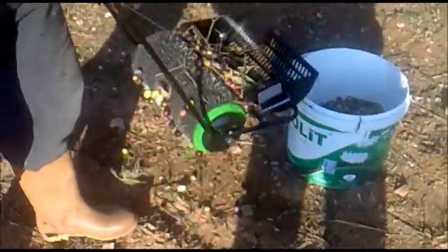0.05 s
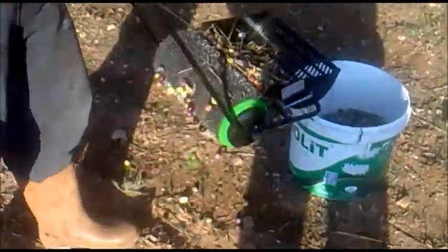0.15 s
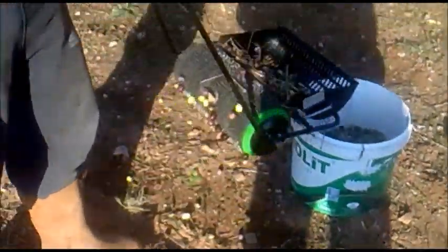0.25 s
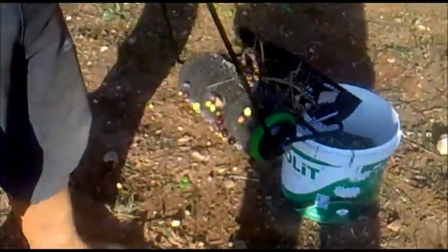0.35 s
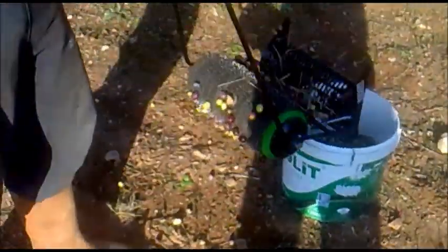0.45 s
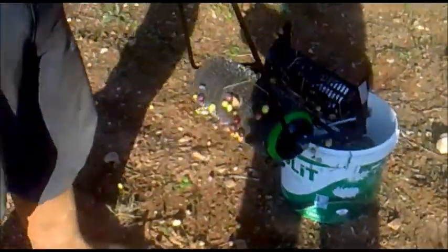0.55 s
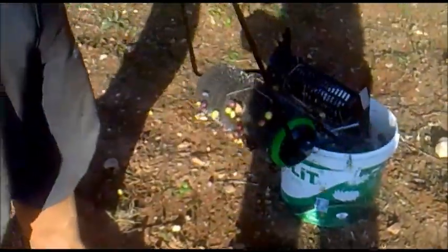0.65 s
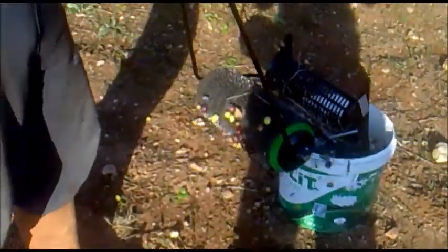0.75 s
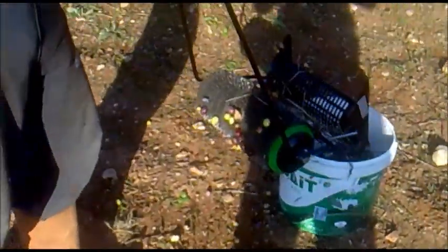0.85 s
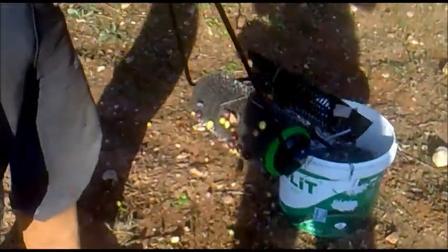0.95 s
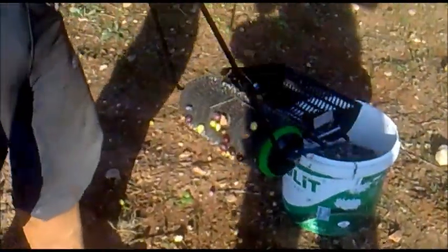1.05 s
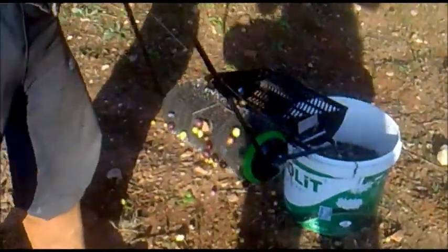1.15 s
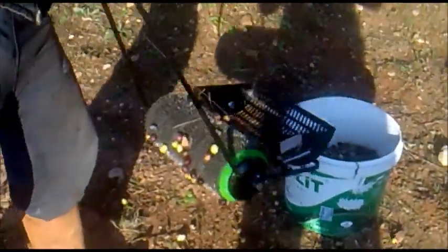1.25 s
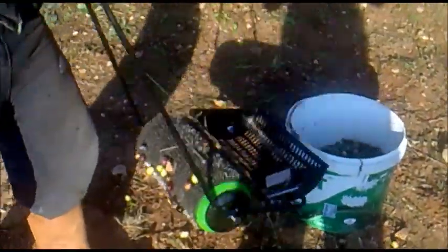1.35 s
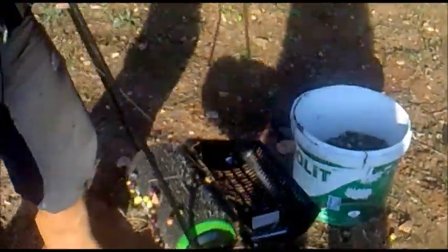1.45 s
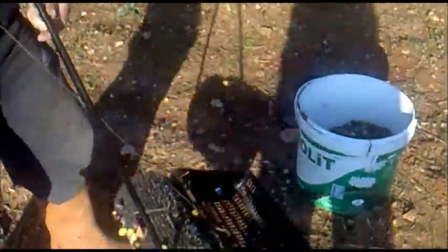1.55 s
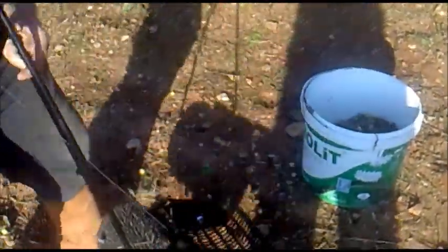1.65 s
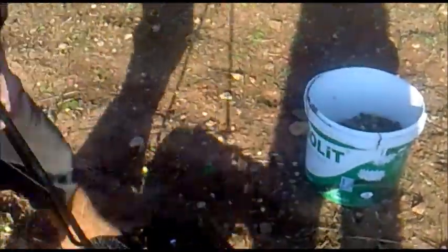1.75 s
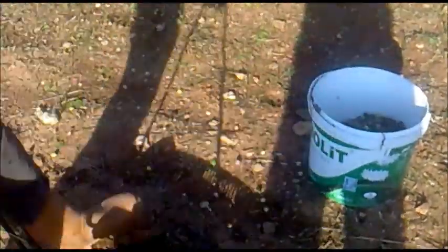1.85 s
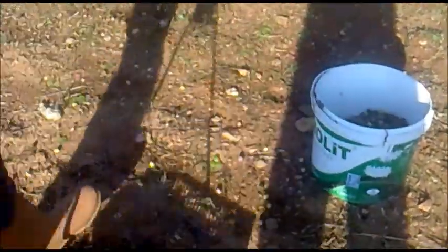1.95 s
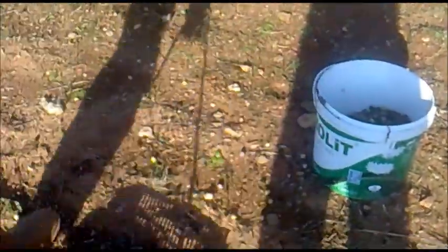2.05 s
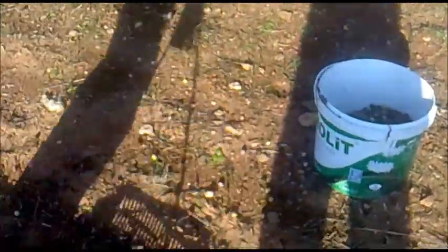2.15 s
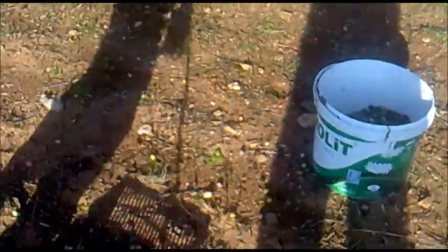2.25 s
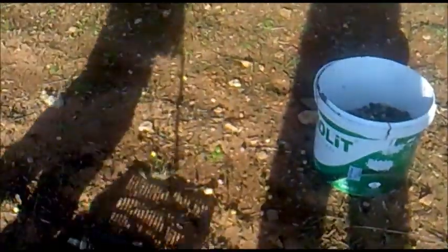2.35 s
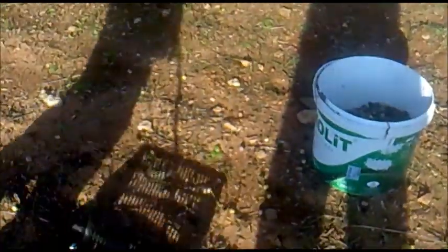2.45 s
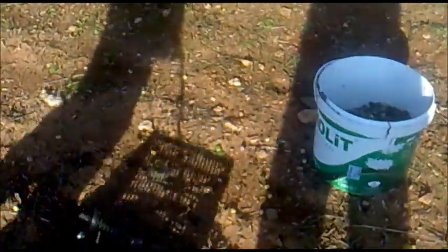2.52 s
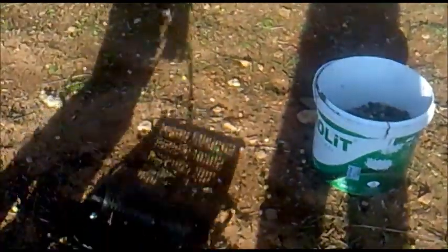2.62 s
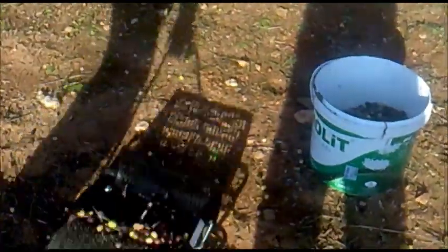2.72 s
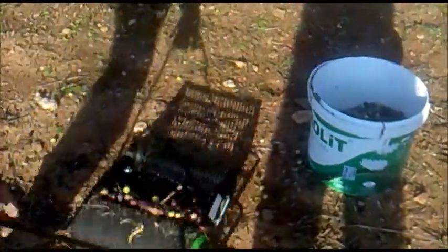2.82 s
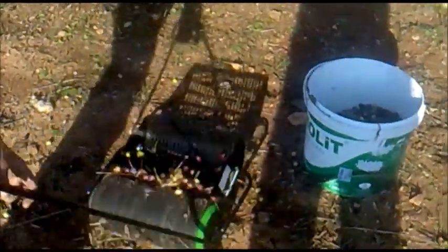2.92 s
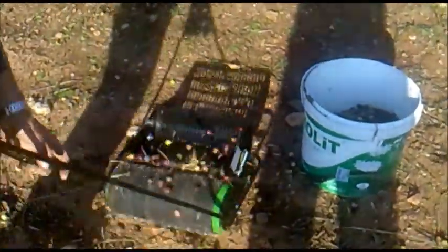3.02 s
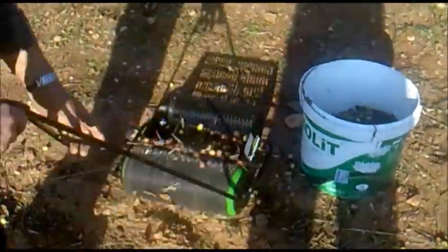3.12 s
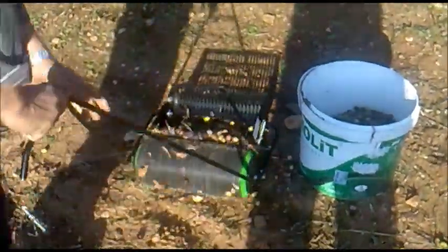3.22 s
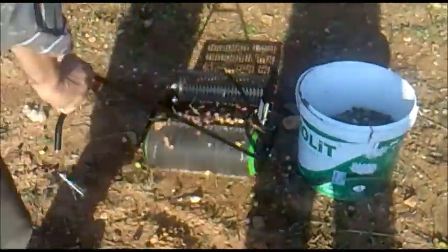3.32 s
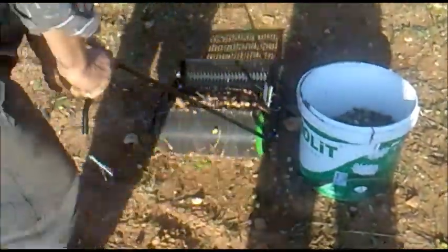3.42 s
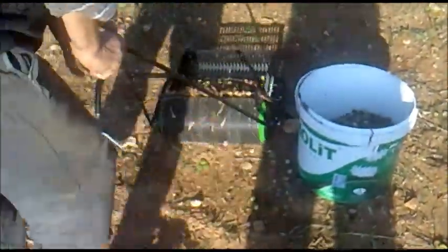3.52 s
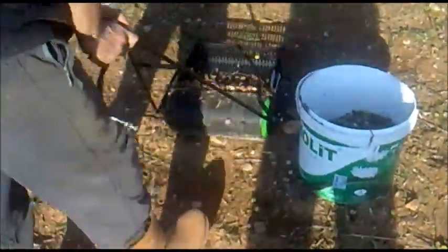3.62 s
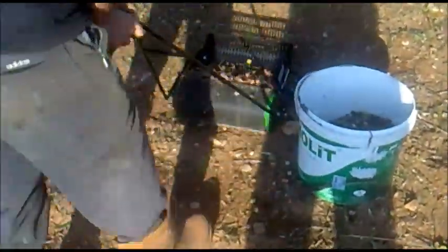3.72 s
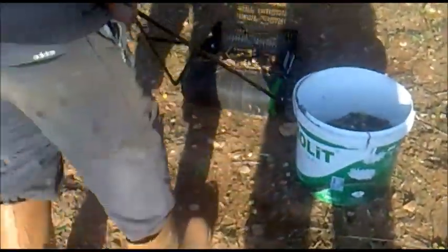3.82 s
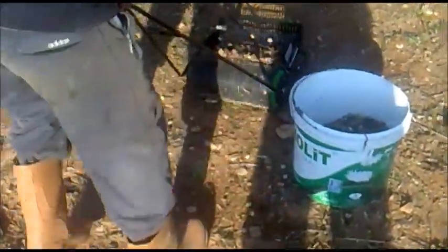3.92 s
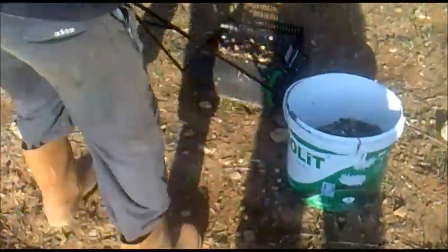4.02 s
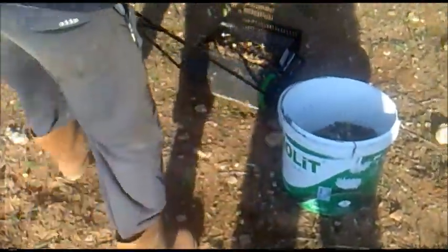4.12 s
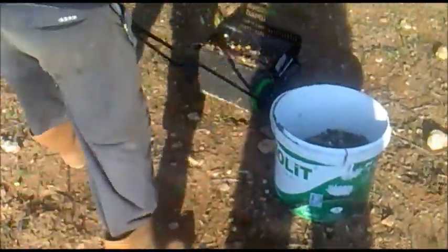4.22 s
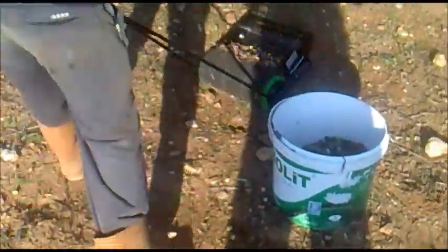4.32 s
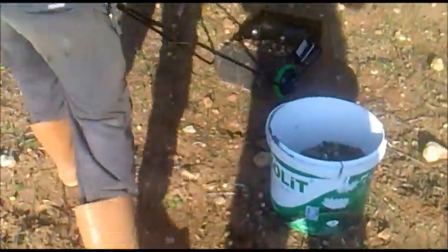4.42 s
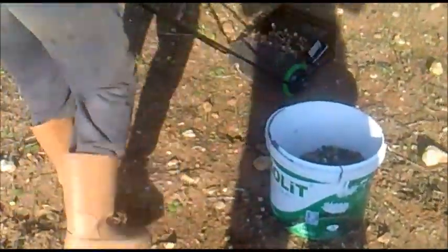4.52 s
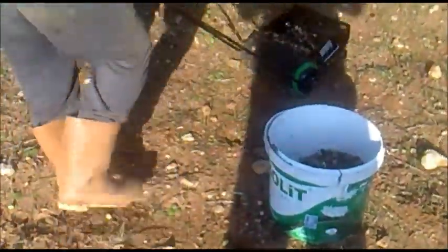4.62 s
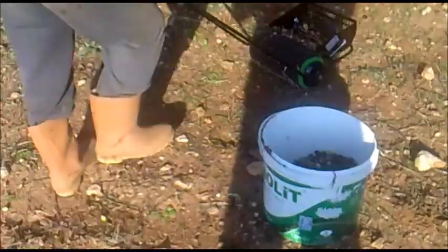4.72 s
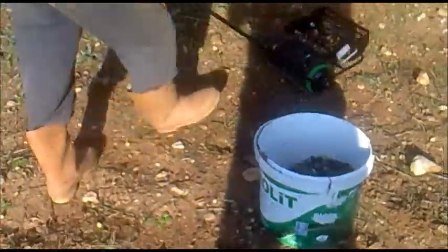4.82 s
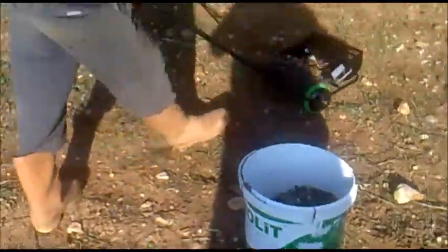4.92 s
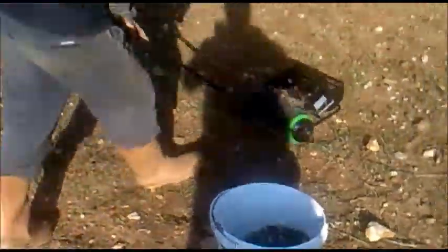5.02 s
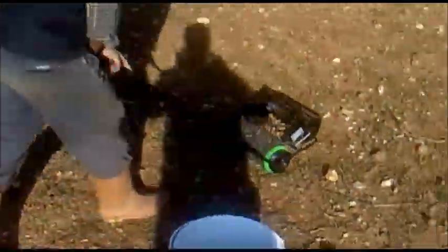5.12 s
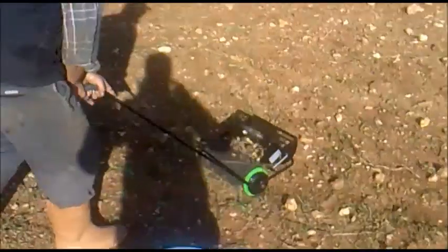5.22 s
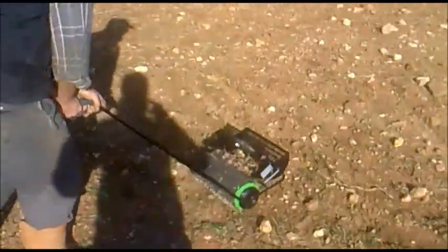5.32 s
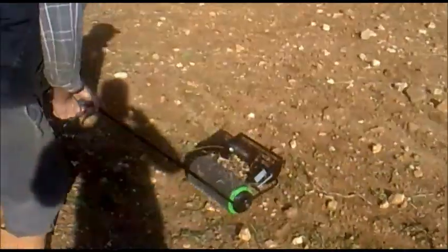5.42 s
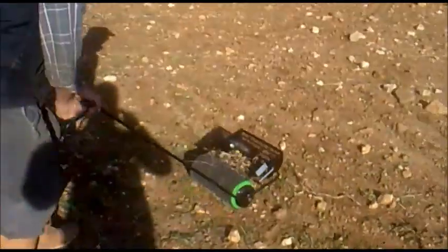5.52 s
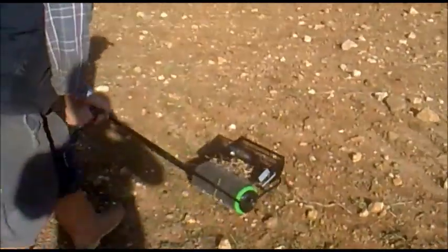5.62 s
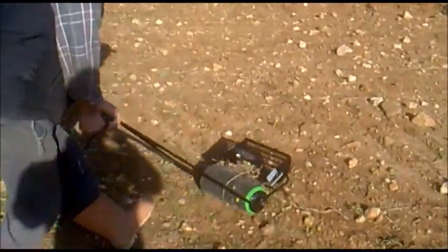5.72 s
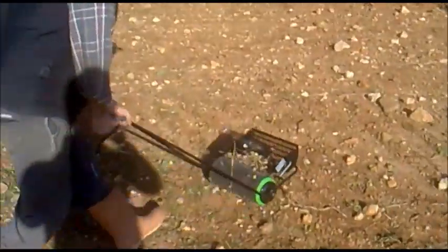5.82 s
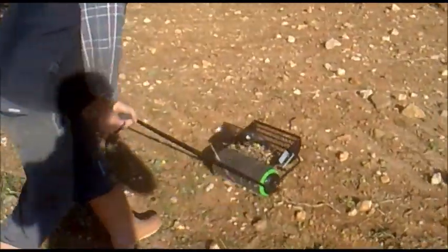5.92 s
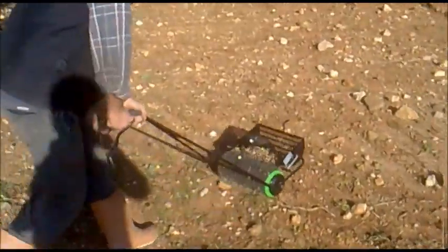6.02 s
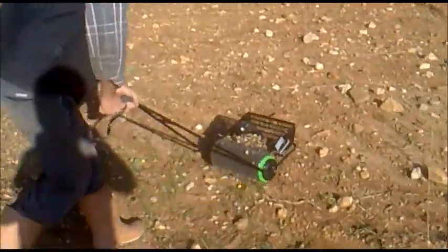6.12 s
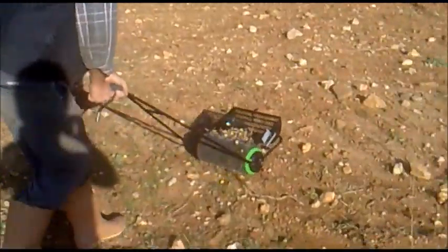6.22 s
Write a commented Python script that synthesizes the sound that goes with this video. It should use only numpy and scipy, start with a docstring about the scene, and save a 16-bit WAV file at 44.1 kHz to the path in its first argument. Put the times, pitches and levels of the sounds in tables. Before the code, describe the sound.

Outdoors on dry stony soil, close mono microphone, no reverberation, faint steady air and low wind puffs. The first half second is quiet, with a small rustle and a tick. At 0.67 s a loud blow: metal basket on plastic bucket rim, a short hollow boom with clattering olives, tumbling on in quick knocks until about 1.1 s. At 1.21 s a second loud blow, brighter and drier, with a sandy snap and fading rattle; wind swells softly. At 1.52 s the steel frame clangs on the ground, ringing under half a second, with lesser jangles at 1.6 and 1.72 s. It nearly falls silent around 2 s, with tiny ticks and pings from 2.3 s. From 2.7 to 4.2 s the roller rattles and scrapes in lurches, with a brief chatter near 3.15 s. After a short lull, a second push from 4.5 s rattles farther off, gritty and uneven, with little taps, stone cracks and wind thuds near 5.4-5.7 s, still rolling at the 6.3 s end.

```python
"""Outdoors, on dry stony soil: a picking roller's basket tips olives into a plastic bucket and knocks the rim twice;
its steel frame clangs on the ground, then the roller is pushed twice, lurching and cracking stones.
Rattle, grit and rumble are coloured random contacts under shared movement gains; olives, bucket, frame
and pings are damped modes. Wind puffs at the microphone are low noise and single pressure swings."""
import sys
import numpy as np
from scipy import signal
from scipy.fft import rfft, irfft
from scipy.io import wavfile
from scipy.ndimage import uniform_filter1d

SR = 44100
rng = np.random.default_rng(int(sys.argv[2]) if len(sys.argv) > 2 else 0)


def store_wav(level_fs):
    """Save 16-bit WAV to argv[1]."""
    pcm = np.round(np.clip(np.atleast_2d(level_fs), -1, 1) * 32767)
    wavfile.write(sys.argv[1], SR, pcm.T.astype(np.int16))


N = 276066

# Spectra, normalised in use: (frequency [Hz], relative density [dB per Hz])
# basket rattle with loose load
BASKET_NEAR_SPECTRUM = [(420, -8.5), (1080, -7), (1350, -1.5), (2470, -4), (3200, -14.5), (4700, -32)]
# basket rattle further off
BASKET_FAR_SPECTRUM = [(610, -32), (744, 1), (1300, 4.5), (1740, -7), (2320, 7), (3100, -8), (3800, -8.5),
                       (4400, -14)]
# sand and twigs shaken about
SAND_SPECTRUM = [(3000, 7), (4600, -1.5), (5350, 8.5), (6400, 9), (10100, -0.5), (11000, -9.5),
                 (16000, -6.5)]
# grit under the drum
SCRAPE_SPECTRUM = [(3000, 4), (4600, -6.5), (5600, 7), (8000, -4), (9600, -9), (10300, -2), (11200, -17),
                   (16000, -10)]
# drum on soil
RUMBLE_SPECTRUM = [(90, -1.5), (257, -1), (429, -5.5), (500, -14), (900, -12)]
# wind at the microphone
WIND_SPECTRUM = [(15, -4.5), (43, -1.5), (62, -1.5), (86, -6), (155, -30), (400, -65.5)]
# steady background noise
AIR_SPECTRUM = [(100, 1.5), (163, -5), (389, -3.5), (600, -10), (1130, -9), (1800, -17), (2320, -12.5),
                (3540, -16.5), (16000, -16.5)]

# Roller moving away: (time [s], power share of the far rattle [0-1])
FAR_SHARE = [(4.3, 0), (4.6, 1)]
# Steady movement of the roller: (time [s], rattle level [dB])
ROLL_LEVELS = [(0.0, -70), (2.2, -72), (2.68, -62.5), (2.85, -53), (3.38, -54), (3.62, -59), (4.18, -60.5),
               (4.3, -70), (4.48, -68), (4.68, -59.5), (4.86, -63), (5.05, -53.5), (5.31, -59),
               (5.62, -55.5), (5.9, -61.5), (6.26, -59)]
# Short lurches: (middle [s], half-length [s], rattle [dB], grit [dB], rumble [dB])
LURCHES = [(0.17, 0.021, -59, -83, -49.5), (0.817, 0.04, -36, -40, -58), (0.873, 0.034, -36.5, -67, -41),
           (0.956, 0.033, -36.5, -56.5, -43), (1.054, 0.14, -47, -57.5, -52.5),
           (1.667, 0.062, -58, -58.5, -71), (2.346, 0.028, -49.5, -58, -59),
           (2.437, 0.084, -61.5, -66.5, -57.5), (3.148, 0.059, -47.5, -49, -46.5),
           (3.514, 0.035, -49.5, -65, -58), (3.745, 0.06, -57.5, -65, -50.5),
           (3.882, 0.075, -58.5, -63, -60), (3.977, 0.04, -54, -67, -57), (4.208, 0.051, -57, -82, -59),
           (4.598, 0.063, -48.5, -55.5, -50), (4.777, 0.027, -50, -61, -57),
           (5.2, 0.069, -56, -62.5, -52.5), (5.466, 0.065, -50.5, -63, -52), (5.771, 0.12, -55, -64, -54.5)]
# Blows that throw the load about: (time [s], rattle [dB], grit [dB], rumble [dB], settling rattle [dB])
BLOWS = [(0.663, -20.5, -66, -26.5, -29.5), (1.208, -20, -26.5, -33.5, -44.5), (1.514, -69, -31, -76, -47)]
# Drum chatter: (middle [s], half-length [s], thump [dB], grit [dB], mean slip rate [1/s])
JUDDERS = [(3.159, 0.019, -45.5, -53, 100), (4.578, 0.021, -41.5, -58, 155)]
# Single olives and stones: (time [s], strike level [dB], pitch [Hz])
TAPS = [(0.314, -28, 1530), (0.665, 2.5, 1966), (0.665, -1.5, 1320), (0.708, -6, 1400),
        (0.7654, -3.5, 1387), (0.783, -11.5, 2090), (0.851, -8.5, 1390), (0.858, -15, 1430),
        (0.927, -16, 1390), (0.946, -9.5, 1450), (0.962, -16, 1740), (1.02, -21, 1800), (1.049, -20, 1430),
        (1.082, -24, 860), (1.211, 1, 1573), (1.211, 5.5, 1990), (1.271, -13.5, 2010), (1.372, -27, 1780),
        (1.383, -22, 1460), (1.393, -21.5, 1950), (1.428, -28.5, 1740), (1.983, -40.5, 2070),
        (2.326, -27, 640), (2.331, -24.5, 1345), (3.067, -30.5, 1380), (4.185, -31.5, 2850),
        (4.647, -32, 2380), (4.872, -36, 2400), (5.055, -40, 2240), (5.109, -26.5, 2280),
        (5.109, -27.5, 1150), (5.219, -30, 2300), (5.232, -28.5, 2150), (5.411, -27.5, 1180),
        (5.733, -34, 1390), (5.944, -30.5, 2420), (6.099, -32.5, 2400)]
# Dry treble snaps: (time [s], level [dB], t60 [s])
SNAPS = [(0.706, -45, .12), (0.761, -38, 0.051), (0.779, -30, 0.081), (0.829, -35.5, 0.075),
         (1.2098, -14.5, 0.034), (1.5152, -17, 0.059), (1.599, -37, 0.1), (1.6405, -40.5, 0.066),
         (1.715, -44.5, 0.17), (2.3099, -46, 0.15), (2.803, -50, 0.043), (5.7005, -46, 0.036),
         (5.9417, -50, 0.059), (6.097, -50, 0.063)]
# Distinct cracking stones: (time [s], peak [dB])
CLICKS = [(2.747, -36), (3.535, -37), (3.594, -40), (4.071, -35.5), (4.555, -37), (5.372, -41)]
# Knocks on the bucket: (time [s], strike level [dB], pitch [Hz])
KNOCKS = [(0.154, -41, 274), (0.666, -2, 279.5), (0.677, -15.5, 224), (0.786, -9.5, 260.6),
          (0.83, -17.5, 264), (0.848, -22.5, 274), (1.22, -20.5, 328), (2.484, -47.5, 294),
          (5.106, -41, 237)]
# Bucket modes: (multiple of the pitch, relative level [dB], t60 [s])
BUCKET_MODES = [(1, -0.5, 0.075), (2.201, -17.5, 0.047), (2.648, -10, 0.039)]
# Blows on the frame: (time [s], level at 2 kHz [dB], hardness [dB per octave])
CLANGS = [(0.665, -41, -20), (1.518, -23.5, 4), (1.603, -38.5, 7.5), (1.72, -48.5, 10)]
# Frame rods: (frequency [Hz], relative level [dB], t60 [s])
FRAME_RODS = [(1282, -14, .52), (1418, -18, .6), (1566, -10, .25), (1604, 0, .34), (1728, -16, .4),
              (1916, -18, .4), (1986, 0, .31), (2326, -6, .09), (2428, -5, .25), (2552, -10, .2),
              (2735, -15, .36), (2881, -21, .5), (3154, -13, .28), (3277, -17, .35), (3379, -8, .18),
              (3784, -7, .17), (3898, -11, .09), (4204, -17, .15), (5986, -13, .1), (6438, -13, .07)]
# Jolts of the long handle rod: (time [s], level [dB])
JOLTS = [(1.517, -45), (1.74, -48), (2.447, -55), (2.597, -56), (2.99, -53)]
# Short high clicks and thin metallic pings: (time [s], strike level [dB], pitch [Hz], t60 [s])
PINGS = [(1.211, -8.5, 8300, 0.011), (1.225, -42.5, 1418, 0.95), (1.724, -40, 2450, 0.27),
         (2.252, -52.5, 5420, 0.12), (1.731, -42, 3240, 0.18), (2.312, -49, 3320, 0.11),
         (2.396, -50.5, 3250, 0.075), (5.425, -54, 3710, 0.1), (5.702, -35, 4770, 0.0083)]
# Wind: (time [s], level [dB])
WIND_LEVELS = [(0.0, -58.5), (0.3, -57.5), (1.1, -59), (1.25, -42), (1.55, -56), (3.3, -57), (3.55, -65),
               (3.95, -55), (4.35, -67.5), (4.95, -57.5), (5.3, -65), (5.45, -50), (5.8, -51.5),
               (6.26, -66)]
# Wind pressure dips: (time [s], size [dB], length [s])
DIPS = [(0.281, -28, 0.0058), (0.288, -24.5, 0.0026), (1.078, -25, 0.0021), (1.107, -22.5, 0.0028),
        (5.632, -31, 0.0025), (5.691, -23, 0.0029)]
# Single wind pressure bump: (time [s], size [dB], length [s])
BUMP = (5.416, -21.5, 0.00326)

GRIT_DB, RUMBLE_DB = -11, -7  # relative to rattle, while rolling and settling
BLOW_RISE_S, BLOW_T60_S, SETTLE_T60_S = 0.0011, 0.2, 0.98
LURCH_EDGE = 2  # steepness of start and end, 2 = bell
CLUMP_S, CLUMP_DB = 0.014, 2.2
CRACKLE_PER_S, CRACKLE_DB = 150, -9.5  # level relative to rattle gain
RODS_DB = -10.5  # relative to rattle gain
RODS_EVEN = 0.3  # share of the rods' dB differences left under light taps
UPPER_MULTIPLE, UPPER_DB = 1.7, -14  # second rib mode
SHAKE_DB = -12  # neighbouring ribs, relative to the struck one
HANDLE_HZ = 2052
MESH_LOW_HZ, MESH_HIGH_HZ, MESH_DB, MESH_T60_S = 1700, 4600, -15, 0.2
AIR_DB = -65
EDGE_HZ = 15850


def amp(db):
    """Decibels to amplitude."""
    return 10 ** (np.asarray(db) / 20)


def evened(x):
    """Scales x to rms 1."""
    return x / np.sqrt(np.mean(x ** 2) + 1e-20)


def add(mix, start_s, sound):
    """Adds sound into mix in place, cut at the end."""
    part = mix[round(start_s * SR):][:len(sound)]
    part += sound[:len(part)]


def curve(rows, column):
    """One table column against time, linear between rows."""
    rows = np.array(rows)
    return np.interp(np.arange(N) / SR, rows[:, 0], rows[:, column])


def coloured(x, spectrum):
    """Filters x by a spectrum, stepping down 36 dB below and 22 dB above its ends; rms 1."""
    f, db = np.transpose(spectrum)
    hz = np.fft.rfftfreq(len(x), 1 / SR)
    gain_db = np.interp(np.log(hz + 1), np.log(f + 1), db, db[0] - 36.0, db[-1] - 22.0)
    return evened(irfft(rfft(x) * amp(gain_db), len(x)))


def ring(hz, t60_s, rise_s):
    """Damped mode with a soft start, one t60 long."""
    t = np.arange(int(t60_s * SR)) / SR
    return (1 - np.exp(-t / rise_s)) * amp(-60 * t / t60_s) * np.sin(2 * np.pi * hz * t)


def contact_sizes(per_s, spread_db):
    """Impulses at random times, a few of them large."""
    size = amp(spread_db * np.minimum(rng.exponential(1, N), 4))
    return size * (rng.random(N) < per_s / SR)


def grains(per_s, spread_db, hiss):
    """Random contacts as noise bursts of a few milliseconds, over a little hiss."""
    decay = np.exp(-1 / (0.0031 * SR))
    bursts = signal.lfilter([1], [1, -decay], contact_sizes(per_s, spread_db))
    return rng.standard_normal(N) * (evened(bursts) + hiss)


def rolling():
    """Load rattle, grit and drum rumble share the movement; the load also rings the frame rods."""
    far_share = curve(FAR_SHARE, column=1)
    rattle_gain, grit_gain, rumble_gain = movement()
    contacts = grains(600, 6.2, 0.18)
    load = evened(contacts) + 0.6 * ribs(1500, 3.2, 0.025)
    near = np.sqrt(1 - far_share) * coloured(load, BASKET_NEAR_SPECTRUM)
    far = np.sqrt(far_share) * coloured(load, BASKET_FAR_SPECTRUM)
    rattle = near + far + crackle()

    sand = grains(400, 3.5, 0.34)
    on_soil = np.arange(N) > ROLL_LEVELS[1][0] * SR  # from the second row on
    grit = np.where(on_soil, coloured(sand, SCRAPE_SPECTRUM), coloured(sand, SAND_SPECTRUM))
    rumble = coloured(0.55 * contacts + grains(92, 4.1, 0.22), RUMBLE_SPECTRUM)
    rod_drive = (1 - far_share) * rattle_gain * evened(contacts)
    return rattle_gain * rattle + grit_gain * grit + rumble_gain * rumble + rods(rod_drive)


def movement():
    """Gains of rattle, grit and rumble: powers of rolling, lurches, blows and settling load add."""
    t = np.arange(N) / SR
    usual = amp([[0], [GRIT_DB], [RUMBLE_DB]])
    power = (usual * amp(curve(ROLL_LEVELS, column=1)) * clumps()) ** 2
    for middle_s, length_s, *db in LURCHES:
        swell = np.exp(-2 * abs((t - middle_s) / length_s) ** LURCH_EDGE)
        power = power + amp(db)[:, None] ** 2 * swell
    for start_s, *db, settle_db in BLOWS:
        since_s = np.maximum(t - start_s, 0)
        rise = np.minimum(since_s / BLOW_RISE_S, 1)
        blow = amp(db)[:, None] * amp(-60 * since_s / BLOW_T60_S)
        settling = usual * amp(settle_db - 60 * since_s / SETTLE_T60_S)
        power = power + rise ** 2 * (blow ** 2 + settling ** 2)
    return np.sqrt(power)


def clumps():
    """The drum meets stones in clumps: a random gain over a few hundredths of a second; rms 1."""
    size = round(CLUMP_S * SR)
    smooth = uniform_filter1d(uniform_filter1d(rng.standard_normal(N), size), size)
    return evened(amp(CLUMP_DB * evened(smooth)))


def ribs(per_s, spread_db, t60_s):
    """Random contacts, each ringing one of 28 basket ribs at its own pitch; rms 1."""
    size = contact_sizes(per_s, spread_db)
    pitches_hz = np.geomspace(600, 4200, 28)
    struck = rng.integers(0, len(pitches_hz), N)
    out = np.zeros(N)
    for k, hz in enumerate(pitches_hz):
        rib = np.sqrt(hz) * ring(hz, t60_s, 0.000047)
        out += signal.oaconvolve(size * (struck == k), rib)[:N]
    return evened(out)


def crackle():
    """Small stones crack at random: sparse sharp contacts of random size and sign."""
    size = rng.laplace(0, 1, N) * (rng.random(N) < CRACKLE_PER_S / SR)
    return amp(CRACKLE_DB) * evened(signal.oaconvolve(size, click(), "same"))


def click():
    """One sharp contact in the colour of the basket; peak 1, centred."""
    pulse = coloured(signal.unit_impulse(512, "mid"), BASKET_NEAR_SPECTRUM) * np.hanning(512)
    return pulse / abs(pulse).max()


def rods(contacts):
    """The load taps the frame, whose rods ring on faintly between contacts."""
    reply = np.zeros(SR)
    for hz, db, t60_s in FRAME_RODS:
        add(reply, 0, amp(RODS_EVEN * db) * ring(hz, t60_s, 0.0013))
    return amp(RODS_DB) * signal.oaconvolve(contacts, reply / np.linalg.norm(reply))[:N]


def judder():
    """The drum chatters: quick, nearly even slips, each a low thump with a spray of grit."""
    t, out = np.arange(N) / SR, np.zeros(N)
    uneven = 1 + 2.1 * uniform_filter1d(rng.standard_normal(N), 400)
    sand = coloured(rng.standard_normal(N), SCRAPE_SPECTRUM)
    for middle_s, length_s, thump_db, grit_db, per_s in JUDDERS:
        phase = np.cumsum(per_s * uneven) / SR % 1
        slips = np.exp(-phase / 0.35)
        thump = amp(thump_db) * coloured(slips, RUMBLE_SPECTRUM)
        spray = amp(grit_db) * evened(slips) * sand
        out += np.exp(-((t - middle_s) / length_s) ** 2) * (thump + spray)
    return out


def taps():
    """Each olive or stone rings a basket rib in two modes and shakes its neighbours."""
    out, t = np.zeros(N), np.arange(2000) / SR
    shake_envelope = (1 - np.exp(-t / 0.0026)) * amp(-60 * t / 0.028)
    for start_s, db, hz in TAPS:
        shake = shake_envelope * coloured(rng.standard_normal(len(t)), BASKET_NEAR_SPECTRUM)
        add(out, start_s, amp(db) * ring(hz, 0.017, 0.0028))
        add(out, start_s, amp(db + UPPER_DB) * ring(hz * UPPER_MULTIPLE, 0.013, 0.0026))
        add(out, start_s, amp(db + SHAKE_DB) * shake)
    return out


def bucket():
    """The plastic wall booms: damped modes at multiples of each knock's pitch."""
    out = np.zeros(N)
    for start_s, db, hz in KNOCKS:
        for multiple, mode_db, t60_s in BUCKET_MODES:
            add(out, start_s, amp(db + mode_db) * ring(hz * multiple, t60_s, 0.00041))
    return out


def frame():
    """Steel rods ring after each blow, a short scatter of contacts that gives each rod its own share."""
    out, t = np.zeros(N), np.arange(1500) / SR
    for start_s, db, hard_db in CLANGS:
        for hz, mode_db, t60_s in FRAME_RODS:
            scatter = 0.02 * rng.standard_normal(len(t)) * amp(-60 * t / 0.04)
            scatter[0] = 1  # main contact
            level_db = db + mode_db + hard_db * np.log2(hz / 2000)
            add(out, start_s, amp(level_db) * signal.oaconvolve(ring(hz, t60_s, 0.00079), scatter))
    return out


def handle():
    """The long handle rod rings in one mode at each jolt."""
    out = np.zeros(N)
    for start_s, db in JOLTS:
        add(out, start_s, amp(db) * ring(HANDLE_HZ, 0.65, 0.004))
    return out


def mesh():
    """Each blow on the frame also rings 80 close, uneven wires; higher ones are weaker and shorter."""
    out = np.zeros(N)
    wires = rng.random((80, 2 + len(CLANGS)))
    for k, (start_s, db, hard_db) in enumerate(CLANGS):
        for place, damping, *shares in wires:
            share = shares[k]
            hz = MESH_LOW_HZ + place * (MESH_HIGH_HZ - MESH_LOW_HZ)
            level_db = db + MESH_DB + hard_db * np.log2(hz / 2000)
            gain = share * (1 - place ** 2) * amp(level_db)
            t60_s = MESH_T60_S * (0.5 + damping) * (1 - place / 2)
            add(out, start_s + 0.0082 * share, gain * ring(hz, t60_s, 0.0011))
    return out


def pings():
    """Short high clicks and thin metallic pings, each one damped mode at one pitch."""
    out = np.zeros(N)
    for start_s, db, hz, t60_s in PINGS:
        add(out, start_s, amp(db) * ring(hz, t60_s, 0.00073))
    return out


def snaps():
    """Sand and twigs shaken loose: sharp bursts of coloured noise that die quickly."""
    out, t = np.zeros(N), np.arange(8000) / SR
    for start_s, db, t60_s in SNAPS:
        envelope = amp(db - 60 * t / t60_s) * (1 - np.exp(-t / 0.0013))
        add(out, start_s, envelope * coloured(rng.standard_normal(len(t)), SAND_SPECTRUM))
    return out


def clicks():
    """The most distinct of the cracking stones."""
    out = np.zeros(N)
    for peak_s, db in CLICKS:
        add(out, peak_s - 256 / SR, amp(db) * click())
    return out


def wind():
    """Lumpy low rumble of turbulence, plus single eddies."""
    out = amp(curve(WIND_LEVELS, column=1)) * coloured(grains(140, 1.8, 0.35), WIND_SPECTRUM)
    dips = np.zeros(N)
    add(out, *eddy(*BUMP))
    for row in DIPS:
        add(dips, *eddy(*row))
    return out - dips


def eddy(middle_s, db, length_s):
    """One push on the membrane, which then swings back; returns start [s] and sound."""
    u = np.arange(-4 * length_s, 8 * length_s, 1 / SR) / length_s
    push = np.exp(-u ** 2)
    swing_back = 0.35 * np.exp(-((u - 1.2) / 3) ** 2)
    return middle_s - 4 * length_s, amp(db) * (push - swing_back)


def air():
    """Steady, faint background noise."""
    return amp(AIR_DB) * coloured(rng.standard_normal(N), AIR_SPECTRUM)


def scene():
    """Sum of all sources, one channel."""
    roller = rolling() + judder()
    struck = taps() + bucket() + frame() + handle() + mesh() + pings()
    debris = snaps() + clicks()
    return (roller + struck + debris + wind() + air())[None]


def record(dry):
    """The input stage rounds off the loudest blows; a linear-phase low-pass follows."""
    rounded = 1.1 * np.tanh(dry / 1.1)
    low_pass = signal.firwin(1023, EDGE_HZ, window=("kaiser", 9), fs=SR)
    return signal.oaconvolve(rounded, low_pass[None], "same")


dry = scene()
out = record(dry)
store_wav(out)
```